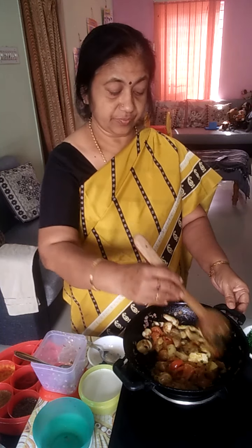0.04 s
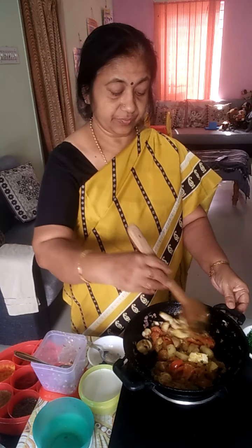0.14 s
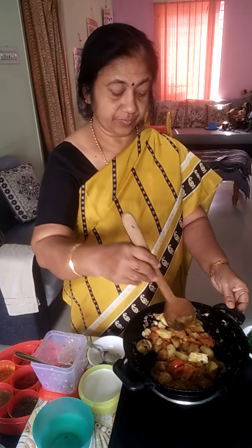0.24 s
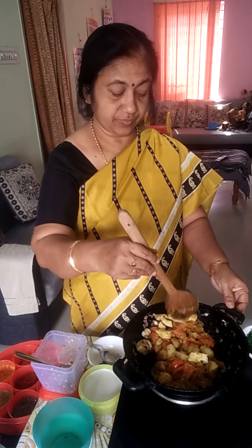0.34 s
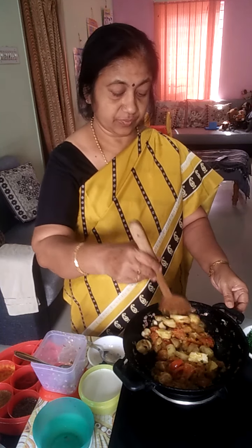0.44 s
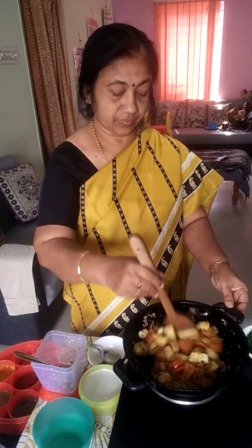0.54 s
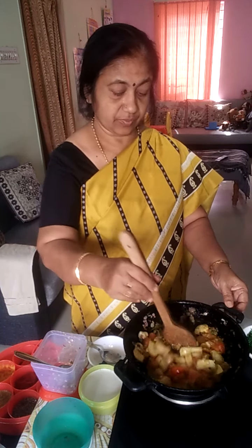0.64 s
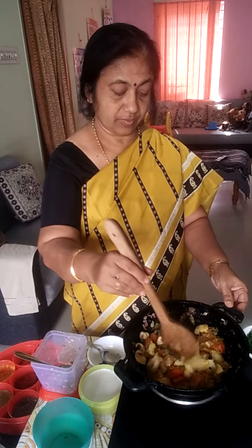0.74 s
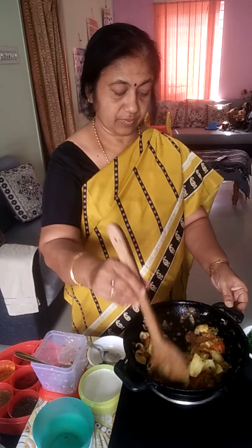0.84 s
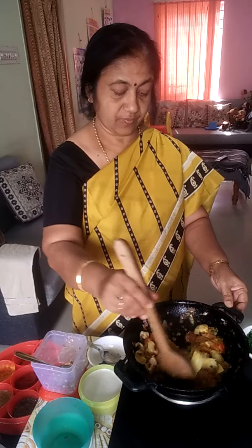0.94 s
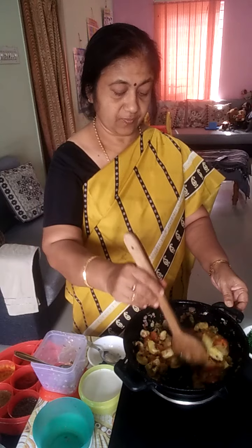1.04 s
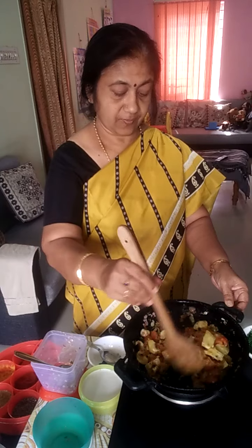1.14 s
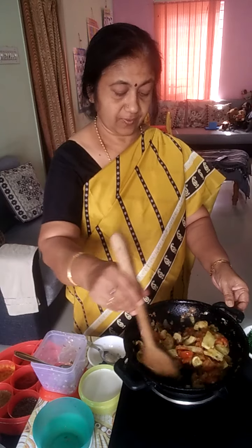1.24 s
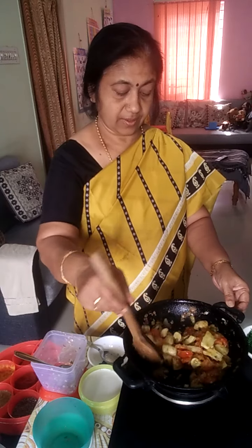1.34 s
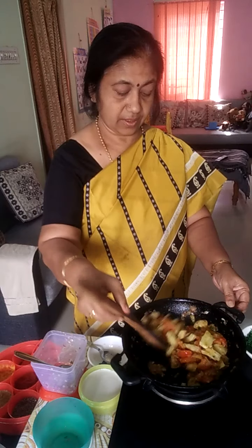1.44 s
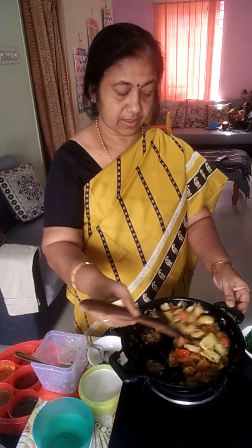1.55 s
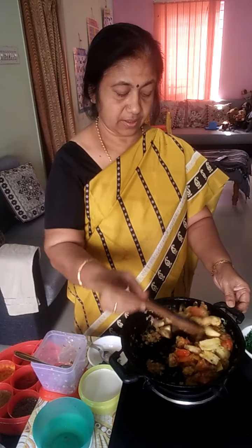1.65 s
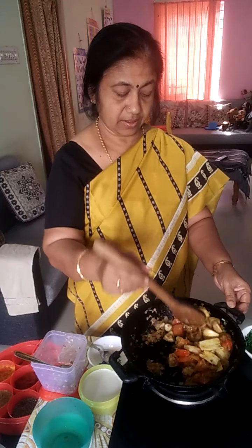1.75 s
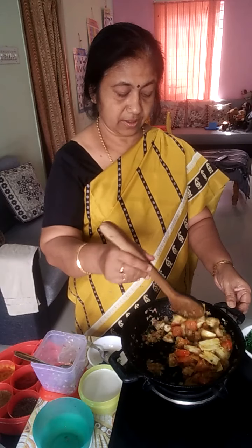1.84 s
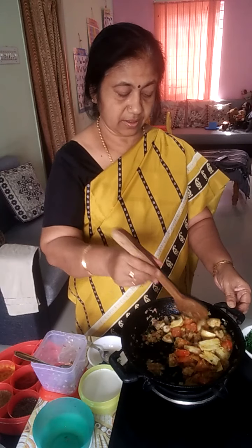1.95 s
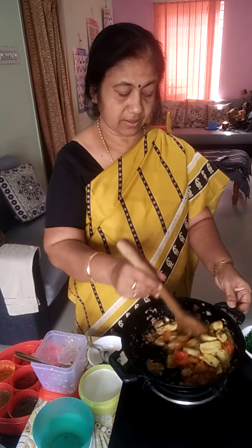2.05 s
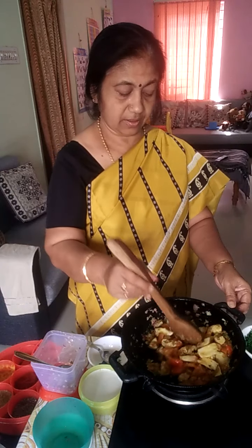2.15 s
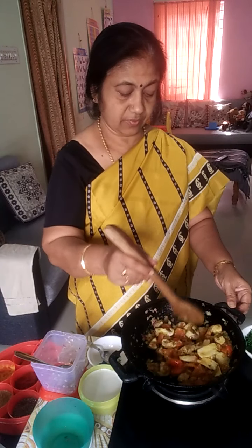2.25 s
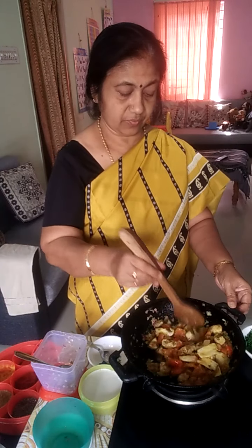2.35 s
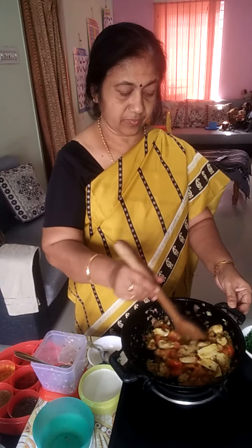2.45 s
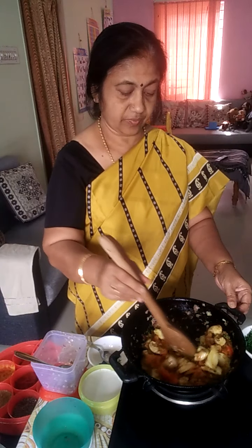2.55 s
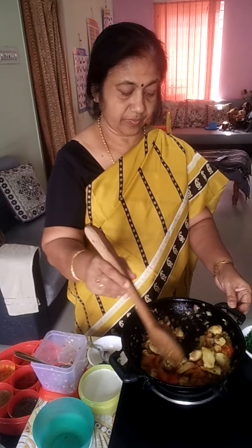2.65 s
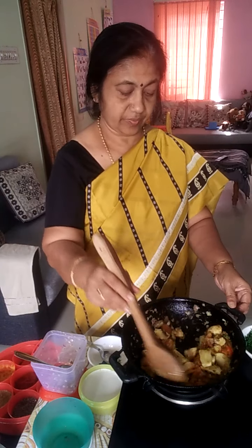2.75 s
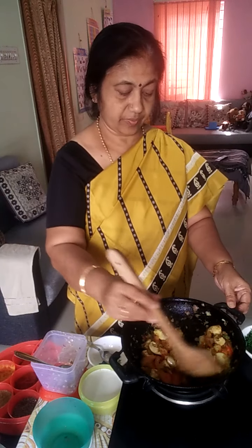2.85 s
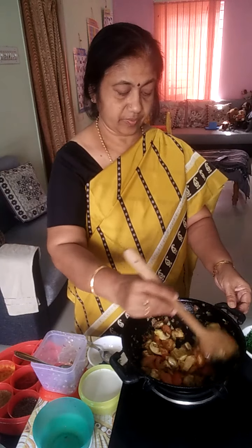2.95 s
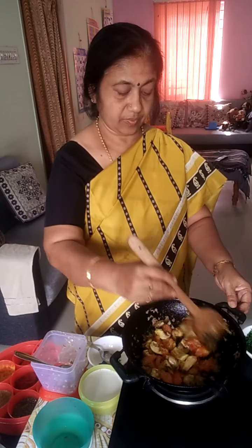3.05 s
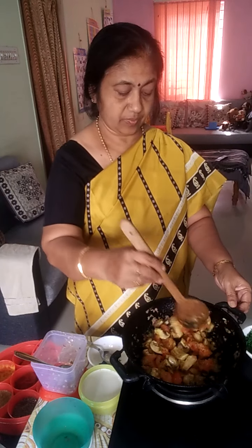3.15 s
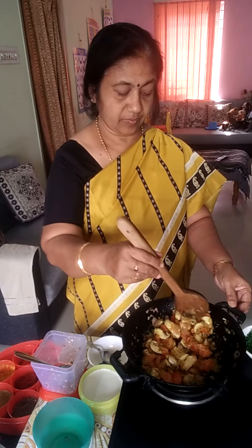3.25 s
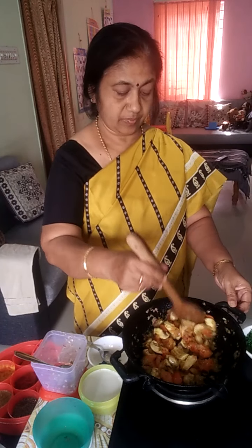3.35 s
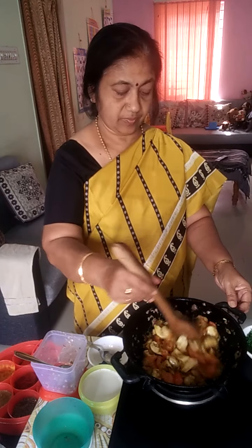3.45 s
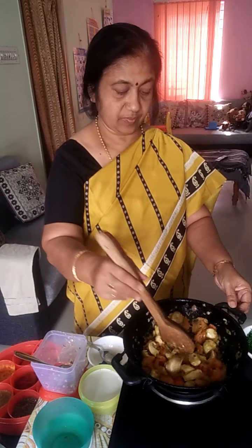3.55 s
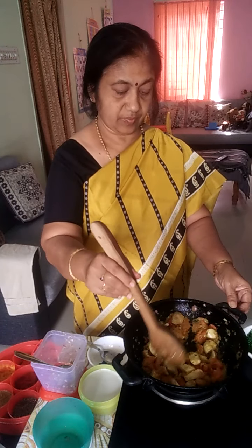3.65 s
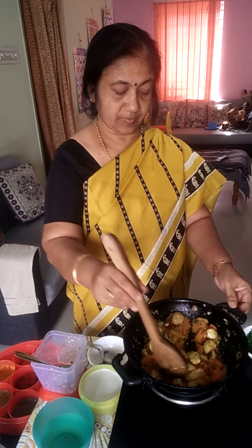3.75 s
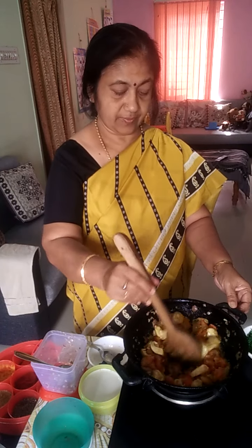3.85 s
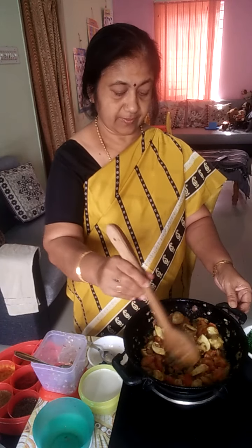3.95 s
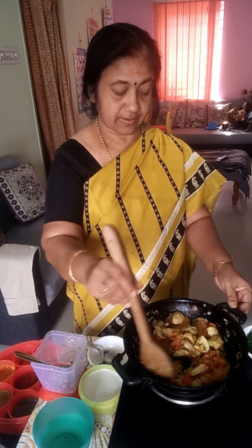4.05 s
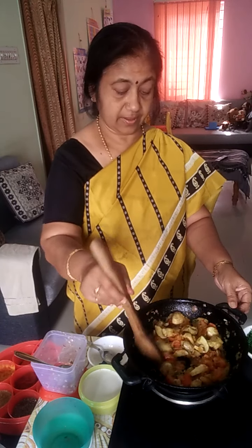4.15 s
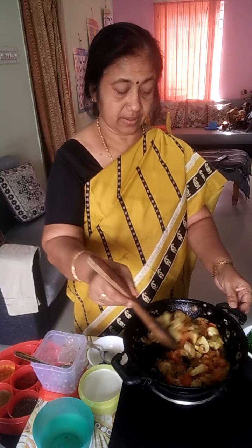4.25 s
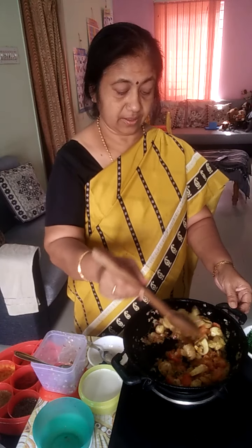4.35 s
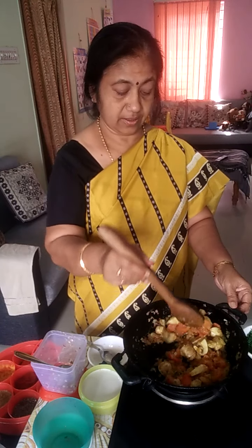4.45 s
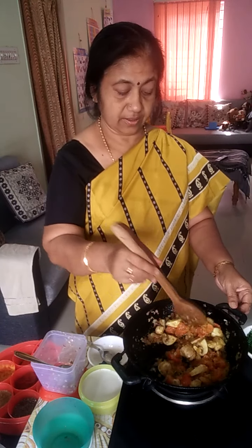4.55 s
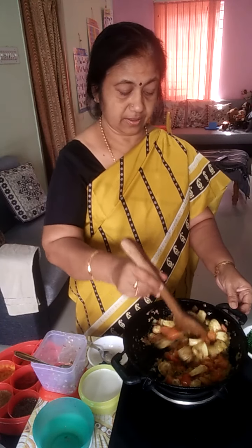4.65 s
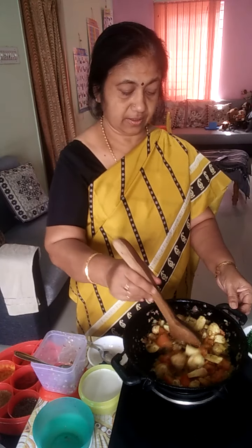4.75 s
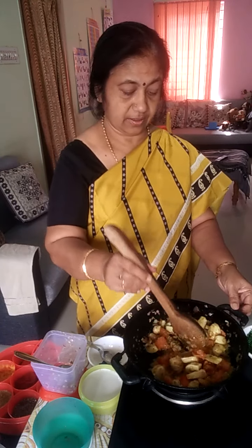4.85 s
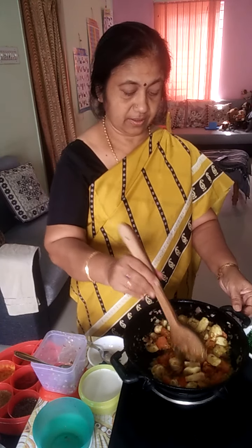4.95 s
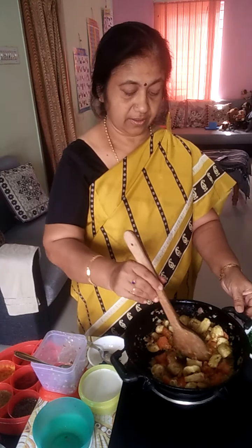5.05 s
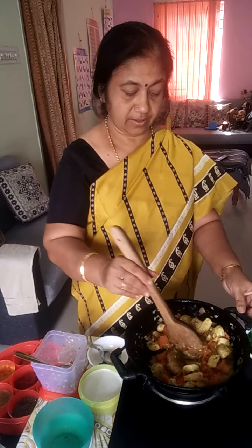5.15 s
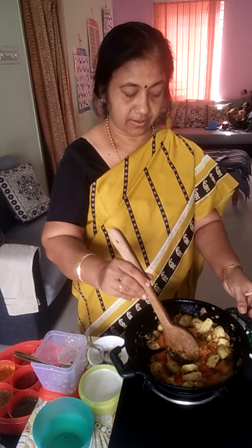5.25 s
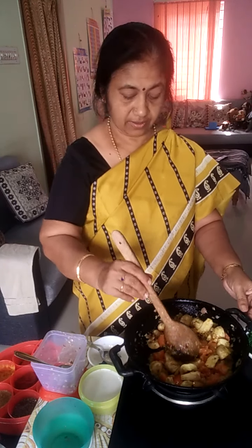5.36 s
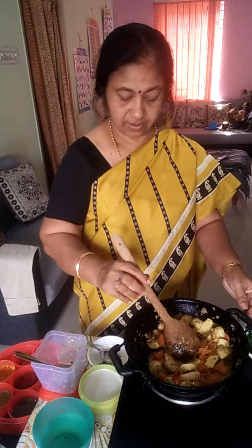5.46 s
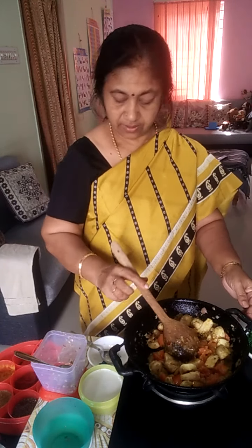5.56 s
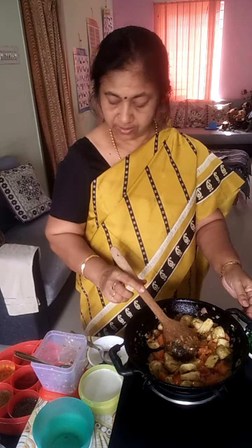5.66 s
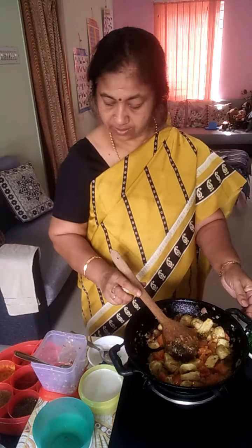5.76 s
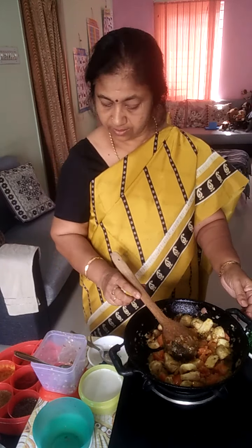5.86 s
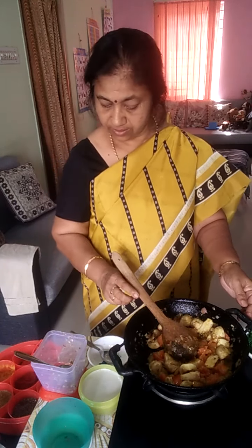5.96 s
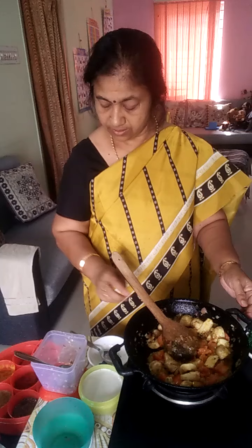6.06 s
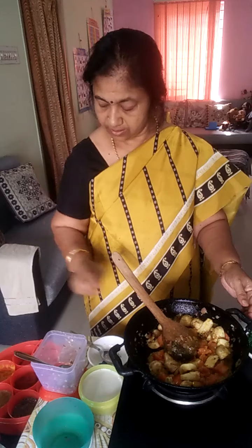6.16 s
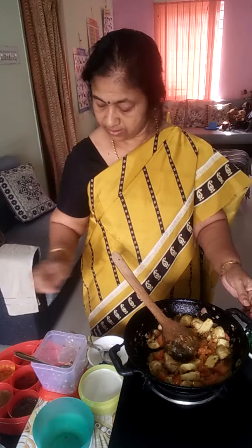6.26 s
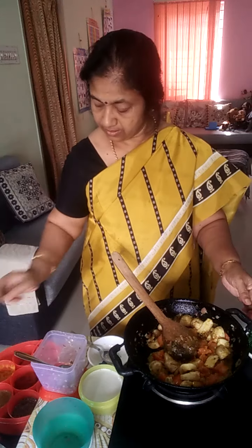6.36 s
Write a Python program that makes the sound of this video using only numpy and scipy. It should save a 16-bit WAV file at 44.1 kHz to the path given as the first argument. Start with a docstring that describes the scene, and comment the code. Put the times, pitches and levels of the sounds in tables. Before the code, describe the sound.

Vegetables sizzle in a deep pan, flaring and fading as a wooden spatula knocks, scrapes and turns them in a home kitchen.

```python
"""A home kitchen: vegetables fry in a deep pan while a wooden spatula turns them over.
Turns lay wet faces on hot metal, so the sizzle, dense tiny pops over hiss, flares and dies back.
Squeezed pieces crackle and squirt, juice bubbles as short rising tones, and drops spit as sharp ticks.
The spatula's knocks and stick-slip scrapes ring the pan's modes; its squeaks are wavering tones.
Toppling pieces patter on the pan over a steady room hush and a lumpy hob rumble."""
import sys
import numpy as np
from scipy import signal
from scipy.fft import rfft, irfft, next_fast_len
from scipy.io import wavfile
from scipy.ndimage import uniform_filter1d, map_coordinates

SR = 44100
rng = np.random.default_rng(int(sys.argv[2]) if len(sys.argv) > 2 else 0)


def generate_wav(sig):
    """Save sig (samples, or channels by samples) to the path in sys.argv[1] as 16-bit PCM at SR."""
    pcm = np.round(np.clip(np.atleast_2d(sig).T, -1, 1) * 32767).astype(np.int16)
    wavfile.write(sys.argv[1], SR, pcm)


N = 282240  # length [samples]


# the spatula turns wet faces onto the metal: (time [s], rise [s], time they stay wet [s], sizzle level [dB])
FACE_TURNS = [(0, 0.0038, 0.046, -56), (0.159, 0.048, .64, -44), (1.235, 0.0076, 0.096, -53),
              (1.439, 0.03, 0.24, -44.5), (1.6, 0.069, 0.22, -38), (2.0, 0.058, 0.32, -47),
              (2.805, 0.017, 0.0067, -51.5), (2.93, 0.012, 0.017, -61.5), (3.089, 0.036, .83, -45),
              (3.2, 0.014, 0.022, -42), (4.259, 0.042, 0.18, -41.5), (4.57, .14, 0.31, -44.5),
              (5.425, 0.012, 0.18, -56.5), (5.77, 0.011, 0.21, -54.5), (6.13, 0.017, .08, -57.5),
              (6.33, 0.012, .03, -51.5)]
DRY_DB_PER_S, IDLE_DB = 31.5, -61  # slowest fall as the faces dry [dB/s], resting sizzle [dB]
FLASH_DB_PER_S, FLASH_S = 65, 0.044  # extra fall for barely wet faces [dB/s], wet time over which it fades [s]


def heat():
    """Sizzle level in dB: turns flare, hold while wet and die back, faster if the faces were barely wet."""
    flares = []
    for time, rise, wet, level_db in FACE_TURNS:
        fall = DRY_DB_PER_S + FLASH_DB_PER_S * np.exp(-wet / FLASH_S)
        flares.append(swell(time, rise, wet, level_db, fall))
    return together(summed(flares), IDLE_DB)


# the spatula squeezes the pieces:
# (time [s], length [s], steam drive [dB], crackle drive [dB], squirt of juice [dB], pocket pitch [Hz])
SQUEEZES = [(0.236, 0.072, -41, -53.5, -54, 1750), (0.334, 0.25, -62, -58, -57.5, 1930),
            (0.586, 0.07, -39, -48.5, -54, 1680), (1.5, 0.11, -48, -52.5, -74, 1820),
            (1.62, 0.087, -53, -44.5, -49, 1672), (1.759, 0.074, -39.5, -57, -54, 1675),
            (2.086, 0.077, -40.5, -47.5, -52.5, 1960), (3.188, 0.14, -50, -54, -57, 2150),
            (3.496, 0.085, -49, -55.5, -49.5, 1765), (4.367, 0.093, -60, -63, -54.5, 2000),
            (4.77, 0.066, -42.5, -53.5, -46, 1940)]
PRESS_RISE, RELAX_DB_PER_S = 0.46, 113  # share of a squeeze spent building up, fall afterwards [dB/s]


def squeezed(levels_db):
    """Level in dB of something driven by the squeezes, given its drive in each."""
    swells = []
    for (time, length, *_), level_db in zip(SQUEEZES, levels_db):
        rise = PRESS_RISE * length
        swells.append(swell(time, rise, length - rise, level_db, RELAX_DB_PER_S))
    return summed(swells)


# colour of the oil's fizz: (frequency [Hz], relative level [dB per Hz])
FIZZ_COLOUR = [(1500, -58), (3500, -29.5), (5500, -16), (6500, -11), (7600, -3), (9000, 1), (10400, -1.5),
               (11500, -5.5), (14200, -16)]
# colour of the finest droplets: (frequency [Hz], relative level [dB per Hz])
SPRAY_COLOUR = [(6000, -33.5), (9500, -17), (11500, 0), (13000, 6), (14400, -2.5), (18000, -5.5)]
SPRAY_DB = -7  # finest spray relative to the turns' sizzle [dB]


def sizzle(heat_db):
    """Steam bubbles burst in flurries, denser when stronger; squeezes add steam. Returns mid and side."""
    level_db = together(heat_db, squeezed([steam_db for _, _, steam_db, *_ in SQUEEZES]))
    rate = 5000 * amp(0.5 * (level_db + 40.5))  # pops per second
    flurry_db = 0.68 * wobble(35) + 0.59 * wobble(250)
    pair = []
    for blur_db in (-1.5, 4):  # the side hears mostly reflections
        fizz = crackle(FIZZ_COLOUR, rate, spread_db=0.5, blur_db=blur_db)
        fizz = patchy(fizz, depth_db=1.96) * amp(level_db + 0.3)
        spray = crackle(SPRAY_COLOUR, rate, spread_db=2.0, blur_db=blur_db)
        spray = patchy(spray, depth_db=2.5) * amp(heat_db + SPRAY_DB)
        pair.append((fizz + spray) * amp(flurry_db))
    return pair


# colour of sliding pieces: (frequency [Hz], relative level [dB per Hz])
SQUELCH_COLOUR = [(500, -36), (1000, -38), (1700, -1.5), (2600, 4.5), (3500, 5.5), (5000, 4.5), (7000, 6.5),
                  (12000, -51.5)]
# crackle at a brisk sizzle [dB], its dB per dB of sizzle, level of a brisk sizzle [dB]
SQUELCH_DB, SQUELCH_FOLLOWS, BRISK_DB = -58.5, 0.45, -44


def squelch(heat_db):
    """Wet pieces part and slide with a fine crackle that follows the frying and leaps with each squeeze."""
    frying_db = SQUELCH_DB + SQUELCH_FOLLOWS * (heat_db - BRISK_DB)
    level_db = together(frying_db, squeezed([crackle_db for _, _, _, crackle_db, *_ in SQUEEZES]))
    pieces = crackle(SQUELCH_COLOUR, rate=1300, spread_db=2.5, blur_db=1.0)
    return patchy(pieces, depth_db=2.0) * amp(level_db)


def squishes():
    """Juice squeezed from between the pieces crackles in a narrow pocket of pitch."""
    out = np.zeros(N)
    for time, length, _, _, level_db, hz in SQUEEZES:
        size = int(max(length, 0.02) * SR)
        pocket = [(hz / 2, -30), (hz * 1.11, -1), (hz * 0.88, -1), (hz * 1.23, -15), (hz * 3, -35)]
        wet = crackle(pocket, rate=700, spread_db=2, blur_db=-3.0, size=size)
        add(out, time, amp(level_db) * unit(wet * signal.windows.tukey(size, 0.5)))
    return in_room(out, wet_db=-2)


# water drops meet the oil: (time [s], peak level of the direct tick [dB])
OIL_SPITS = [(1.247, -34), (2.169, -24), (2.372, -30), (2.59, -39), (3.211, -23), (3.389, -29),
             (3.598, -25), (3.927, -25.5), (4.907, -29), (5.447, -35), (5.782, -33)]


def spits():
    """Single drops of water burst in the oil: a noise tick that dies in about a millisecond, then its echo."""
    out = np.zeros(N)
    t = np.arange(SR // 100) / SR
    for time, level_db in OIL_SPITS:
        tick = coloured(rng.standard_normal(len(t)) * np.exp(-t / 0.00064), FIZZ_COLOUR)
        add(out, time, amp(level_db) * tick / np.abs(tick).max())
    return out + amp(2.0) * echo(out)


# juice boiling under the pieces, which also drives their tumbling: (time [s], level before trim [dB])
JUICE_BOIL = [(0.0, -59), (0.3, -58.5), (0.45, -59.5), (0.64, -54.5), (0.86, -60), (1.37, -59.5),
              (1.57, -56.5), (2.33, -60), (2.92, -59.5), (3.62, -55.5), (4.83, -58.5), (5.04, -61.5),
              (5.38, -59), (6.4, -56)]
# colour of the bubbles: (frequency [Hz], relative level [dB per Hz])
BUBBLE_COLOUR = [(300, -29.5), (520, -3), (610, -4.5), (740, -14), (1000, 3), (1200, -3), (1500, 5.5),
                 (1850, 6.5), (2150, 4.5), (2700, 4), (4000, -14)]


def bubbling(heat_db, count=2000):
    """Bubbles in the juice ring for a few cycles and rise in pitch as they surface."""
    start, pitch, size = rng.random((count, 3)).T[:, :, None]
    t = np.arange(SR // 50) / SR
    first = (start * N).astype(int)
    hz = 600 * 5 ** pitch
    age = t * hz / 12  # in decay times: each bubble fades over 12 cycles
    tilt_db = 1.05 * (heat_db[first] + 53) * (pitch - 0.5)  # a gentler simmer favours larger, lower bubbles
    strength = amp(tilt_db - 1.74 * np.log(size + 0.01))
    envelope = strength * np.exp(-age) * (1 - np.exp(-t / 0.00055))
    grains = envelope * np.sin(2 * np.pi * hz * t * (1 + 0.016 * age))
    boil = np.bincount((first + np.arange(len(t))).ravel(), grains.ravel(), N)[:N]
    return in_room(unit(coloured(boil, BUBBLE_COLOUR)), wet_db=1) * amp(curve(JUICE_BOIL) + 0.5)


# modes of the pan on its hob: (frequency [Hz], level before scatter [dB], t60 [s])
PAN_MODES = [(182.4, -15.5, 0.31), (234, -15.5, 0.24), (293.5, -14.5, 0.4), (320.7, -3.5, 0.17),
             (430.7, -2.5, 0.18), (467.3, -10.5, 0.4), (629.5, -8, 0.23), (724, -21, 0.12),
             (786.4, -1, 0.16), (828, 1, 0.06), (874.3, 1.5, 0.21), (933, -5.5, 0.17), (1024, -9.5, 0.59),
             (1240, -22, 0.25), (1174, -5, 0.15), (1278, -15, 0.39), (1470, -9, 0.061), (1519, -5.5, 0.053),
             (1634, -6.5, 0.047), (2080, -13, 0.16), (2220, -30, 0.2)]
# colour of the wooden clop: (frequency [Hz], relative level [dB per Hz])
WOOD_COLOUR = [(25, -35), (80, -12.5), (230, -10), (315, 1), (370, -17), (430, -20), (530, -5), (640, 5),
               (850, 5.5), (1200, -6), (1650, -6.5), (2100, -25), (3000, -30), (6000, -50)]


def pan_ring(scatter_db, wood_db, wood_t60):
    """One contact: the pan's modes at strengths set by the spot, and the short clop of the wood."""
    t = np.arange(SR // 2) / SR
    hz, level_db, t60 = np.transpose(PAN_MODES)[:, :, None]
    strength = amp(level_db + scatter_db * rng.standard_normal(level_db.shape))
    strength = strength * rng.choice([-1, 1], level_db.shape)
    ring = np.sum(strength * amp(-60 * t / t60) * np.sin(2 * np.pi * hz * t), axis=0)
    clop = unit(coloured(rng.standard_normal(len(t)), WOOD_COLOUR)) * amp(wood_db - 60 * t / wood_t60)
    return (ring + clop) * (1 - np.exp(-t / 0.00045))


# spatula blows and the scrape that follows each:
# (time [s], blow before chatter, rms re 40 ms [dB], dullness before chatter [dB],
#  time to press through the food [s], scrape drive [dB], scrape hold after its rise [s])
SPATULA_BLOWS = [(0, -52.5, 3, 0.0042, -68, .03), (0.157, -47.5, 6, 0.036, -62, .03),
                 (0.574, -43.5, 7, 0.037, -48.5, 0.085), (0.684, -46, 7, 0.021, -63, 0.24),
                 (1.0155, -39.5, -1, 0.0028, -56.5, 0.042), (1.348, -35.5, -2.5, 0.0038, -50.5, .06),
                 (1.514, -51, 34, 0.0139, -59, 0.14), (2.139, -53.5, -2, .049, -65, .03),
                 (2.548, -50.5, 8.5, 0.041, -55, 0.11), (2.882, -38.5, -1, 0.0038, -51.5, .06),
                 (4.179, -47, 5.5, 0.062, -52.5, 0.092), (4.284, -50.5, 10.5, 0.05, -63.5, .1),
                 (4.719, -56, -9, 0.018, -68, .03), (4.792, -44, 8.5, 0.034, -49, 0.057),
                 (5.128, -58.5, 5, 0.077, -67.5, .05), (5.843, -53.5, 6.5, 0.066, -63, .14)]
# the graze, blow and two rebounds of a chatter: (delay [s], level change [dB], added dullness [dB])
BARE_CHATTER = [(-.008, -19, 8), (0, -1, -1), (.009, -5, 1), (.026, -5.5, 3.5)]
BARE_S, CLACK_LOSS = 0.015, 0.47  # quicker blows meet bare metal [s], dB of clack lost per dB of dullness


def knocks():
    """The spatula meets the pan: bare blows clack and chatter, ones padded by food thump in a short run."""
    out = np.zeros(N)
    for time, level_db, dull_db, press, *_ in SPATULA_BLOWS:
        size = int(max(press, 0.001) * SR)
        contacts = BARE_CHATTER if press < BARE_S else [(0, 0, 0)]
        for delay, step_db, duller_db in contacts:
            force = rng.standard_normal(size) * np.hanning(size)
            thump_db = dull_db + duller_db
            tone = [(330, thump_db), (750, 0), (1100, 0), (1600, -CLACK_LOSS * thump_db)]
            ring = coloured(pan_ring(scatter_db=3.0, wood_db=6.5, wood_t60=0.15), tone)
            blow = in_room(signal.fftconvolve(ring, flattened(force)), wet_db=-7.5)
            blow = blow * np.sqrt(SR // 25) / np.linalg.norm(blow)  # its energy as rms over 40 ms
            add(out, time + delay, amp(level_db + step_db) * blow)
    return out


# wood catching on the metal: (time [s], length [s], pitch before waver [Hz], rms level before room [dB])
WOOD_SQUEAKS = [(0, .055, 1273, -57), (1.052, .019, 1515, -52), (1.082, 0.024, 1276, -49.5),
                (1.41, 0.033, 1222, -45.5), (1.644, 0.025, 1654, -48.5), (4.387, 0.017, 1730, -50),
                (4.824, .025, 1224, -48), (4.866, 0.044, 1288, -50)]
DRAG_RISE_S, DRAG_DB_PER_S = 0.027, 73  # a scrape's build-up [s], its fall when the stroke ends [dB/s]


def scrapes():
    """After each blow the wooden edge sticks and slips along the pan; where it catches evenly it squeaks."""
    out = np.zeros(N)
    tone = [(300, -3.0), (600, -7.5), (850, -3.5), (1050, 10.0), (1600, -2.5)]
    for time, *_, level_db, length in SPATULA_BLOWS:
        slips = pops(600, spread_db=3.5, size=SR)
        rub = signal.fftconvolve(slips, pan_ring(scatter_db=2.5, wood_db=13.0, wood_t60=0.11))[:SR]
        stroke = swell(0, DRAG_RISE_S, length, level_db, DRAG_DB_PER_S)[:SR]
        add(out, time, unit(coloured(rub, tone)) * stroke)
    for time, length, hz, level_db in WOOD_SQUEAKS:
        size = int(max(length, 0.01) * SR)
        wavering_hz = hz * (1 + 0.02 * wobble(420, size=size))
        phase = 2 * np.pi * np.cumsum(wavering_hz) / SR
        add(out, time, amp(level_db) * unit(np.sin(phase) * signal.windows.tukey(size, 0.7)))
    return in_room(out, wet_db=-14.5)


def tumbling():
    """Many pieces topple softly against the pan and keep it ringing faintly."""
    ring = pan_ring(scatter_db=1.5, wood_db=7.5, wood_t60=0.044)
    taps = signal.fftconvolve(pops(150, spread_db=1.5), ring)[:N]
    tone = [(180, -6), (320, -11.0), (450, -11), (600, -6.5), (820, -7.0), (1020, 2.5), (1600, 2.0)]
    return unit(coloured(taps, tone)) * amp(curve(JUICE_BOIL) - 7)


# colour of the room hush: (frequency [Hz], relative level [dB per Hz])
HUSH_COLOUR = [(20, -12), (50, -13), (100, -12), (160, -13.5), (240, -22.5), (480, -12.5), (700, -10.5),
               (1400, -10), (4000, -20.5), (4900, -11.5), (6000, -12), (14000, -34)]
# colour of the hob rumble: (frequency [Hz], relative level [dB per Hz])
RUMBLE_COLOUR = [(20, -31), (35, -7.5), (48, 4), (70, -2), (110, -2.5), (170, -14.5), (300, -26),
                 (800, -50)]
# the hob and table shaken by the stirring: (time [s], rumble level before trim [dB])
HOB_SHAKE = [(0.0, -65.5), (0.41, -82), (0.45, -65), (0.53, -80), (0.59, -59), (0.91, -71), (1.39, -68.5),
             (2.44, -82.5), (2.58, -72.5), (3.23, -58), (3.26, -75), (3.42, -63), (4.06, -74.5),
             (4.81, -59.5), (5.47, -72.5), (5.52, -63), (5.63, -72.5), (6.4, -60.5)]


def background():
    """The room's steady hush and the low, lumpy shaking of the hob, both shaped noise."""
    hush = amp(-67.5) * unit(coloured(rng.standard_normal(N), HUSH_COLOUR))
    lumps = amp(2 * wobble(22))
    rumble = unit(coloured(rng.standard_normal(N), RUMBLE_COLOUR) * lumps)
    return hush + amp(curve(HOB_SHAKE) - 0.25) * rumble


# the kitchen's reverberation: (frequency [Hz], t60 [s])
KITCHEN_DECAY = [(150, 0.32), (1000, 0.87), (4000, 0.3), (12000, 0.22)]


def echo(x, size=256):
    """The kitchen's diffuse answer, about as strong as x: noise that decays at each frequency's own rate."""
    hz, t, z = signal.stft(rng.standard_normal(SR // 2), SR, nperseg=size)
    t60 = along(KITCHEN_DECAY, hz)[:, None]
    tail = signal.istft(z * amp(-60 * t / t60) / np.sqrt(t60), SR, nperseg=size)[1]
    delayed = np.pad(tail / np.linalg.norm(tail), (SR // 250, 0))  # starts after 4 ms
    return signal.fftconvolve(x, delayed)[:len(x)]


def in_room(x, wet_db):
    """Direct sound and echo, at about the power of x."""
    return (x + amp(wet_db) * echo(x)) / np.hypot(1, amp(wet_db))


def pops(rate, spread_db, size=N):
    """Random impulses of rms 1, rate a second: many small ones and a few large."""
    fired = rng.random(size) < rate / SR
    sizes = amp(spread_db * np.minimum(rng.exponential(size=size), 5))
    signs = rng.choice([-1, 1], size)
    return unit(fired * sizes * signs / np.sqrt(rate))  # denser pops are each smaller


def crackle(spectrum, rate, spread_db, blur_db, size=N):
    """Dense pops of rms 1; their countless reflections blur into a hiss around them."""
    blur = amp(blur_db) * rng.standard_normal(size)
    return unit(coloured(pops(rate, spread_db, size) + blur, spectrum))


def patchy(x, depth_db):
    """x at rms 1, its colour shifting from moment to moment as different pieces lie on the metal."""
    z = signal.stft(x, nperseg=256)[2]
    field = uniform_filter1d(rng.standard_normal(z.shape), size=6, axis=0)
    field = uniform_filter1d(field, size=12, axis=1)
    return unit(signal.istft(z * amp(depth_db * unit(field)), nperseg=256)[1][:N])


def coloured(x, spectrum, size=4096):
    """x through a causal filter of the given spectrum, so that clicks keep their sharp fronts."""
    cepstrum = irfft(np.log(amp(along(spectrum, np.fft.rfftfreq(size, 1 / SR)))))
    cepstrum[1:size // 2] *= 2  # folding the cepstrum gives minimum phase
    cepstrum[size // 2 + 1:] = 0
    return signal.fftconvolve(x, irfft(np.exp(rfft(cepstrum))))[:len(x)]


def filtered(x, response):
    """x times a response of frequency."""
    m = next_fast_len(N + SR // 2)
    return irfft(rfft(x, m) * response(np.fft.rfftfreq(m, 1 / SR)), m)[..., :N]


def flattened(x):
    """x with its phases kept and an even spectrum."""
    return irfft(np.exp(1j * np.angle(rfft(x))))


def swell(time, rise, hold, level_db, fall_db_per_s):
    """Gain of one swell: a straight rise, a hold and an even fall in dB."""
    age = np.arange(N) / SR - time
    fall_db = fall_db_per_s * np.maximum(age - rise - hold, 0)
    return np.clip(age / max(rise, 1e-3), 0, 1) * amp(level_db - fall_db)


def summed(gains):
    """Level in dB of unrelated swells that overlap."""
    return 10 * np.log10(np.sum(np.square(gains), axis=0) + 1e-12)


def together(a_db, b_db):
    """Level in dB of two unrelated sounds at once."""
    return 20 * np.log10(np.hypot(amp(a_db), amp(b_db)))


def wobble(rate, size=N):
    """A smooth random curve, rate knots a second."""
    knots = rng.standard_normal(int(size * rate / SR) + 4)
    return map_coordinates(knots, [np.arange(size) * rate / SR])


def curve(rows):
    """(time [s], value) rows as one value per sample."""
    return np.interp(np.arange(N) / SR, *np.transpose(rows))


def along(points, hz):
    """(frequency [Hz], value) points read on a log axis."""
    f, v = np.transpose(points)
    return np.interp(np.log(hz + 1), np.log(f + 1), v)


def amp(db):
    """Decibels to gain."""
    return 10 ** (np.asarray(db) / 20)


def unit(x):
    """x at rms 1."""
    return x / np.sqrt(np.mean(x ** 2) + 1e-20)


def add(track, time, sound):
    """Mix a sound into the track at a time in seconds."""
    part = track[max(round(time * SR), 0):][:len(sound)]
    part += sound[:len(part)]


# the treble is wide, the rest central: (frequency [Hz], gain of the side signal [dB])
SIDE_WIDTH = [(2500, -62), (3800, -71), (5400, -13.5), (7200, -5), (14000, -4)]


def scene():
    """The pan stands straight ahead; only its hiss and crackle spread to the sides."""
    heat_db = heat()
    mid, side = sizzle(heat_db)
    mid = mid + squelch(heat_db) + squishes() + spits() + bubbling(heat_db)
    mid = mid + knocks() + scrapes() + tumbling() + background()
    side = filtered(side + squelch(heat_db), lambda hz: amp(along(SIDE_WIDTH, hz)))
    return np.array([mid + side, mid - side])


def record(dry):
    """A steep band limit: nothing is kept from 14350 Hz up."""
    return filtered(dry, lambda hz: hz < 14350)


dry = scene()
out = record(dry)
generate_wav(out)
```